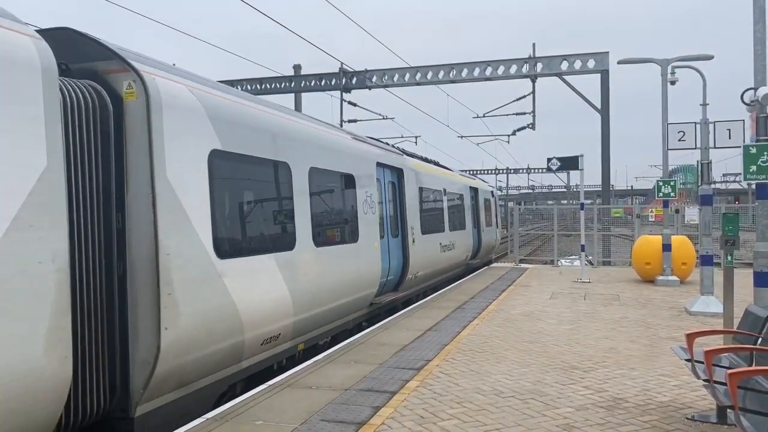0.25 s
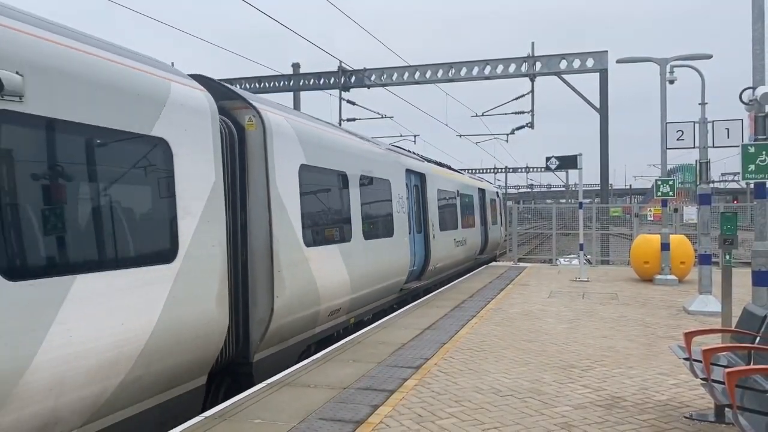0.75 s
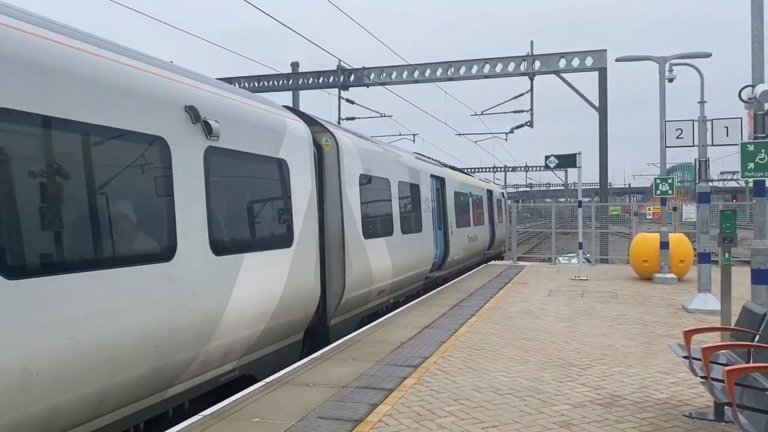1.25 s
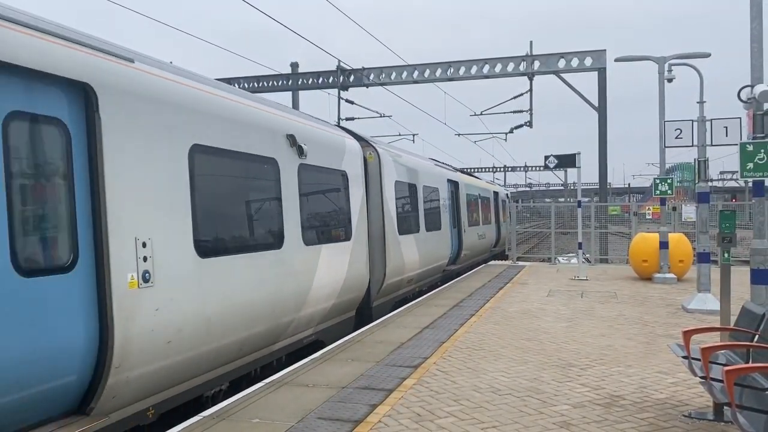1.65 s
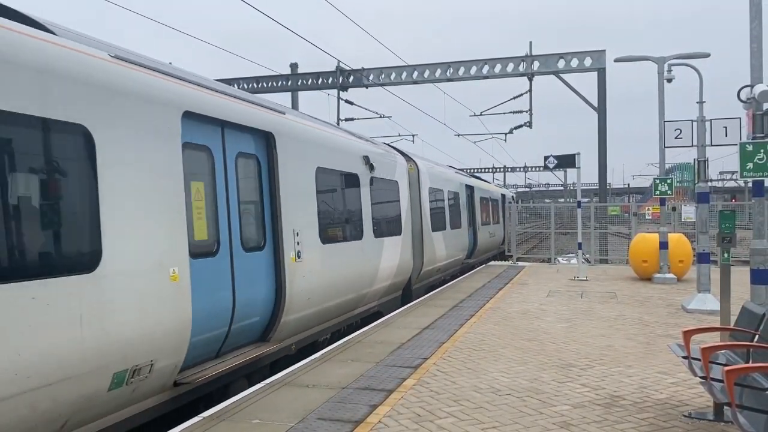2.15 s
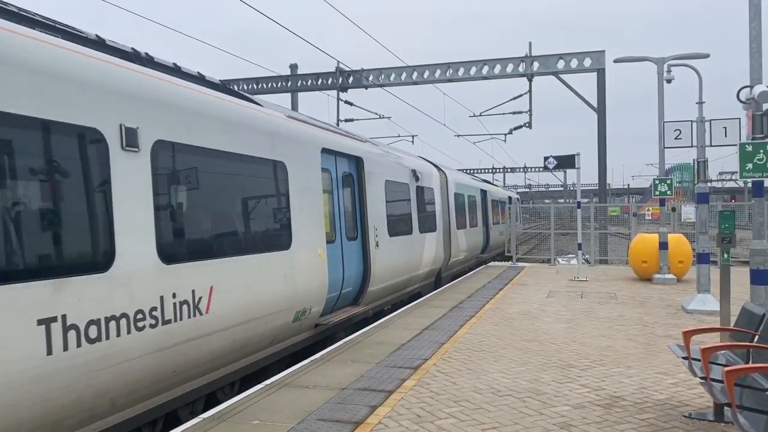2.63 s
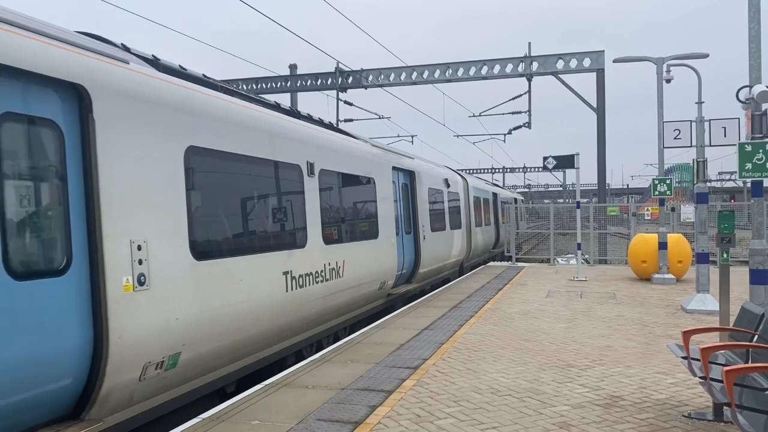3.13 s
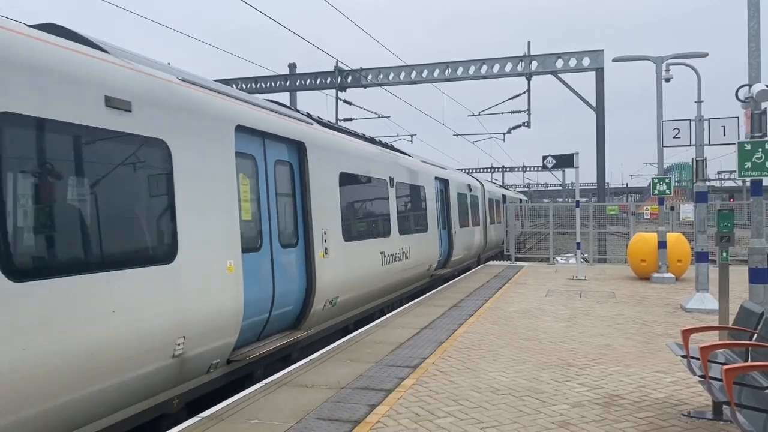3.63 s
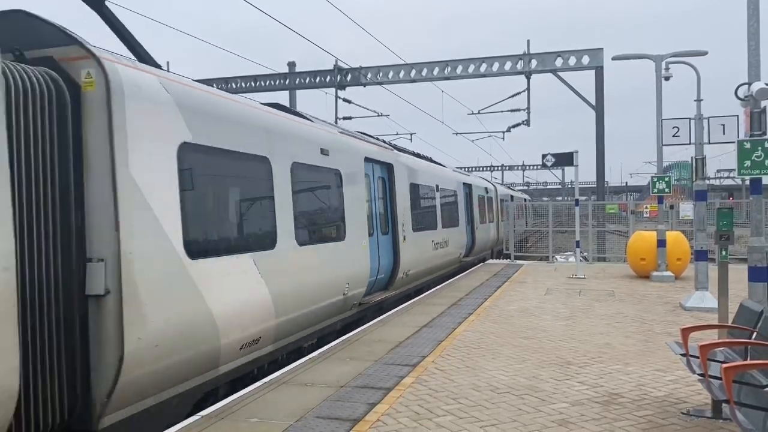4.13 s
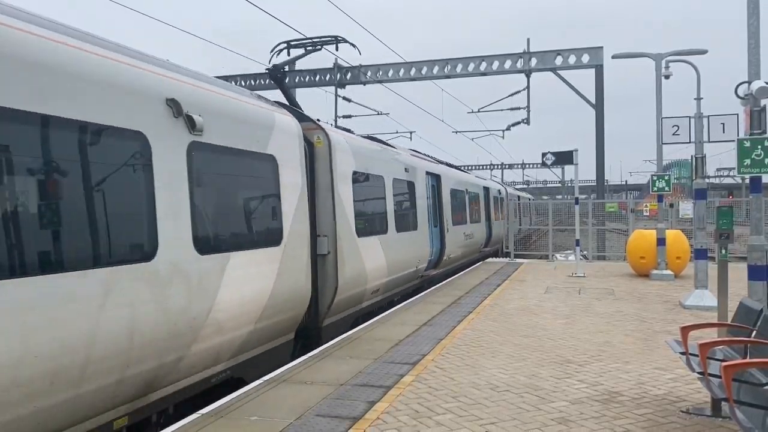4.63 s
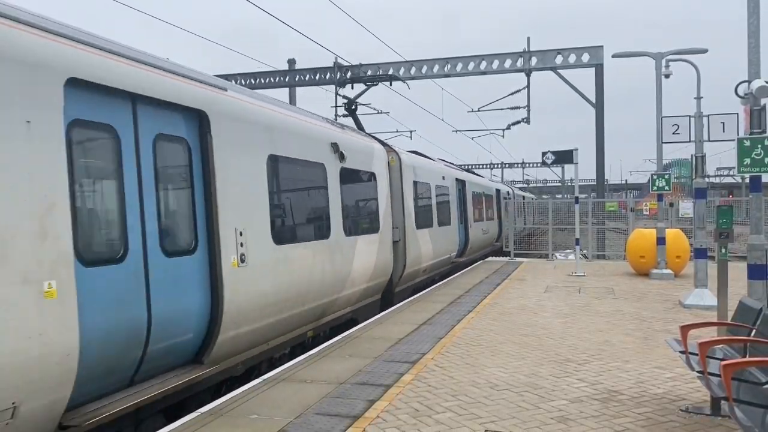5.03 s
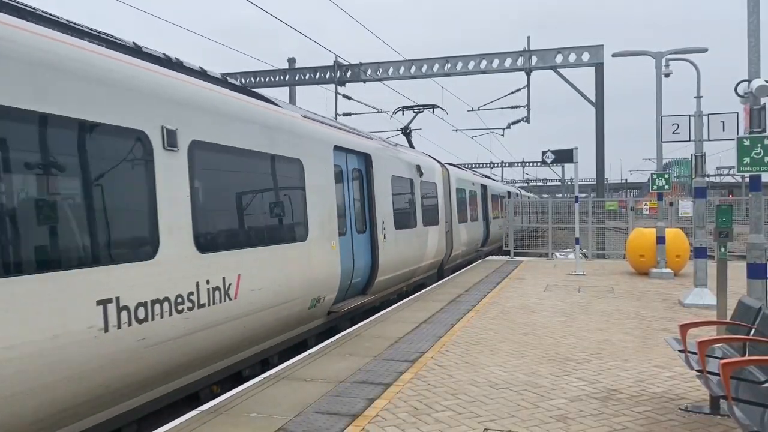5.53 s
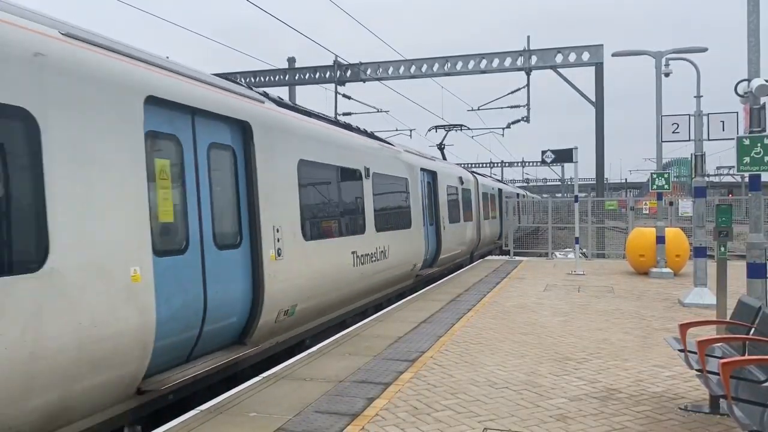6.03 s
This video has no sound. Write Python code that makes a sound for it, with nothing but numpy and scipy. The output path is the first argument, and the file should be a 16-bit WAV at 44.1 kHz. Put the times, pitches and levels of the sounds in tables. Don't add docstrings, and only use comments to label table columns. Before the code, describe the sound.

Close stereo phone pickup of an accelerating electric train outdoors. Fixed-rate electric motor singing mixes with low gear hum that slides upward. Underfloor converters buzz past in turn, thin cooling air rushes, and the wheels rumble with soft booming jolts rather than sharp clacks. Rail hiss brightens in the second half, with a short wheel squeak just before the end, while the train is still passing.

```python
import sys
import numpy as np
from scipy import signal
from scipy.fft import rfft, irfft, next_fast_len
from scipy.io import wavfile
from scipy.ndimage import uniform_filter1d

SR = 44100
rng = np.random.default_rng(int(sys.argv[2]) if len(sys.argv) > 2 else 0)


def attenuation_scalar(level_db):
    decades = np.asarray(level_db, float) / 20
    return 10 ** decades


def put_to_file(sound):
    columns = np.atleast_2d(sound).T
    safe = np.clip(columns, -1, 1)
    whole_steps = np.round(safe * 32767)
    wavfile.write(sys.argv[1], SR, whole_steps.astype(np.int16))


N = 276947

METRES_PER_TURN = .047
# [passing t/s, strength/dB]
MOTOR_CARS = [
    (-.2, 1.5),
    (4.351, 0.5),
    (6.3, -4.5),
]


def evened(x):
    return x / np.sqrt(np.mean(x ** 2) + 1e-20)


def read(points, hz, count=1):
    table = np.transpose(points)
    return np.interp(np.log(hz + 1), np.log(table[0] + 1), table[count])


def curves(rows, t):
    s, *columns = np.transpose(rows)
    return np.array([np.interp(t, s, c) for c in columns])


def frame_grid(size):
    t = np.arange(N * 4 // size + 6) * size / 4 / SR
    return t, np.fft.rfftfreq(size, 1 / SR)[:, None]


def noise(power):
    size = 2 * len(power) - 2
    real, imag = rng.standard_normal((power.shape[1], len(power), 2, 2), np.float32).T
    spectra = (real + 1j * imag) * np.sqrt(power * SR * 2 / size)
    return signal.istft(spectra, nperseg=size, noverlap=size * 3 // 4)[1][:, :N]


def hump(hz, centre_hz, width_hz):
    return np.exp(-.5 * ((hz - centre_hz) / width_hz) ** 2) / (np.sqrt(2 * np.pi) * width_hz)


def wavering(turns, spread):
    now = np.arange(N)
    drift, fade = uniform_filter1d(rng.standard_normal((2, 2, N // 512 + 2)), size=3)
    knots = np.arange(drift.shape[1]) * 512
    fade = evened(attenuation_scalar(2.5 * evened(fade)))
    wander = np.array([np.interp(now, knots, np.cumsum(d)) for d in drift])
    strength = np.array([np.interp(now, knots, d) for d in fade])
    return np.sqrt(2) * strength * np.sin(2 * np.pi * (turns + spread * wander))


def swells(lists, t):
    def summed(rows):
        return sum((db * np.exp(-((t - s) / half_s) ** 2) for s, half_s, db in rows), 0 * t)
    return np.array([summed(rows) for rows in lists])


def gear_rate(t):
    return 44.14 + 18.2 * t - .12 * t ** 2


def passing(t, pass_s, nearest_m=2.66):
    speed = METRES_PER_TURN * gear_rate(t)
    along = np.cumsum(speed) * (t[1] - t[0])
    along = along - np.interp(pass_s, t, along) - min(pass_s, 0) * speed[0]
    metres = np.hypot(along, nearest_m)
    return 1 - speed * along / metres / 343, metres


def by_motor_cars(parts, t):
    near = sum(attenuation_scalar(2 * db) * (2.535 / passing(t, s)[1]) ** 2 for s, db in MOTOR_CARS)
    near_db = 10 * np.log10(near)
    return np.array([db + follow * np.interp(t - lag, t, near_db) + db_per_s * t
                     for db, follow, db_per_s, lag in parts])


def blowers():
    # [level beside a motor car/dB, follow/(dB per dB of nearness), growth/(dB/s), lag/s]
    rushes = [(-67.5, 0.6, 2.28, 0.09), (-67.5, 1.0, 1.2, .15)]
    t, hz = frame_grid(size=1024)
    low_db, high_db = by_motor_cars(rushes, t)
    low = attenuation_scalar(2 * (low_db + 2.5)) * hump(hz, 9040, 900)
    high = attenuation_scalar(2 * (high_db - 2.5)) * hump(hz, 13800, 1000)
    return noise(low + high)


def wheels():
    # [t/s, level/dB]
    load = [(0.0, -58), (0.3, -60), (0.6, -60), (1.75, -58), (2.1, -58), (2.89, -57), (3.2, -56.5),
            (3.78, -54.5), (4.2, -51.5), (4.67, -51.5), (5.1, -52.5), (5.35, -53), (5.81, -50.5),
            (6.05, -48.5), (6.28, -49.5)]
    # [level at middling load/dB, follow/(dB per dB of load)]
    load_parts = [(-36.5, .75), (-33, 0.95), (-48.5, 1.71)]
    # [t/s, half length/s, rise/dB]
    jolts = [
        [(0.5, 0.049, 6), (3.06, .07, -0.5), (3.4, 0.14, 5), (5.13, 0.05, 3), (5.3, .05, 5)],
        [(0.25, 0.14, 5), (3.15, 0.13, 4.5), (3.41, 0.17, 1.5), (3.75, 0.056, -8.5), (4.29, 0.094, -9),
         (4.6, 0.094, 2.5), (5.2, 0.13, 6), (5.4, 0.22, 7), (5.95, 0.033, -9), (6.2, 0.19, 1)],
        [(4.29, 0.065, 6.5), (5.15, 0.044, -3), (5.81, .05, 2)],
    ]
    # [f/Hz, level/dB per Hz]
    rumble, boom = [(15, -42), (26, -12), (60, 1), (118, -4.5), (145, -1), (177, -3.5), (200, 0.5),
                    (260, -36), (440, -120)], [(59, -29), (100, -26), (145, -19), (182, -15.5), (247, 4.5),
                                    (329, -12.5), (443, -16.5), (500, -13.5), (650, -63), (1100, -120)]
    hiss_far, hiss_near = [(350, -73), (700, -74), (1100, -79.5), (1600, -82), (1800, -83), (2350, -87.5),
                           (3750, -92.5), (4400, -92.5), (5000, -91.5), (7100, -99), (8700, -89),
                           (11300, -100), (12800, -106), (15000, -108)], [(350, -63.5), (700, -67), (1100, -72), (1600, -72.5),
                                             (1800, -71.5), (2350, -72.5), (3750, -75.5), (4400, -76),
                                             (5000, -80.5), (7100, -86), (8700, -99), (11300, -95),
                                             (12800, -99), (15000, -103)]
    # [f/Hz, width/Hz, level/dB]
    rail = [(1994, 42, -5.5), (2144, 27, -3.5), (2535, 62, -3.5)]
    # [t/s, half length/s, level/dB, f/Hz]
    squeaks = [
        (4.3, .04, -45, 2140),
        (5.815, 0.033, -34.5, 2220),
    ]

    t, hz = frame_grid(size=2048)
    load_db = curves(load, t)[0]
    levels = [db + follow * (load_db + 55) for db, follow in load_parts]
    rumble_db, boom_db, rail_db = levels + swells(jolts, t)
    near = np.clip((load_db + 59) / 9, 0, 1.3)
    hiss_db = (1 - near) * read(hiss_far, hz) + near * read(hiss_near, hz) + 0.15
    hiss_db = hiss_db - 60 * (hz < 250) - 8.4 * np.clip(hz / 3000 - 2.5, 0, 1.7)

    power = attenuation_scalar(2 * (rumble_db + read(rumble, hz) - 20.5))
    power += attenuation_scalar(2 * (boom_db + read(boom, hz) - 24.5))
    power += attenuation_scalar(2 * hiss_db)
    for f, width, db in rail:
        power += attenuation_scalar(2 * (rail_db + db)) * hump(hz, f, width)
    for s, half_s, db, f in squeaks:
        power += attenuation_scalar(2 * db) * hump(hz, f, 28) * np.exp(-2 * ((t - s) / half_s) ** 2)

    patches = rng.standard_normal((len(hz), len(t)))
    patches = uniform_filter1d(uniform_filter1d(patches, size=14, axis=0), size=8, axis=1)
    return noise(power * attenuation_scalar(2 * 1.7 * evened(patches)))


def converter():
    # [passing t/s, lower cluster/dB, upper cluster/dB], levels when nearest
    boxes = [
        (2.27, -42.5, -48),
        (3.7, -50.5, -54.5),
        (4.7, -43, -54),
        (6.5, -44.5, -53),
    ]
    step_hz = 95.6
    t, hz = frame_grid(size=8192)
    shift = passing(t, 2.22, 5.2)[0]
    far = [passing(t, s, 3.71)[1] / 4.01 for s, _, _ in boxes]
    low_db = 10 * np.log10(sum(attenuation_scalar(2 * db) / m ** 3 for (_, db, _), m in zip(boxes, far)))
    high_db = 10 * np.log10(sum(attenuation_scalar(2 * db) / m ** 4.8 for (_, _, db), m in zip(boxes, far)))

    power = attenuation_scalar(2 * (low_db - 3.5)) * hump(hz, 3080 * shift, 152)
    power += attenuation_scalar(2 * (high_db - 3.0)) * hump(hz, 5985 * shift, 240)
    power += attenuation_scalar(2 * (high_db - 13.0)) * hump(hz, 8850 * shift, 260)
    for k in range(-2, 3):
        power += attenuation_scalar(2 * (low_db - 11.0)) * hump(hz, (3072 + k * step_hz) * shift, 7.4)
        power += attenuation_scalar(2 * (high_db - 11.5)) * hump(hz, (6035 + k * step_hz) * shift, 5.2)
    return noise(power)


def gears():
    multiples = [1, 2, 3, 8, .8, 1.6, 2.5, 4, 5, 6, 7, 9]
    # [level at the start/dB, growth/(dB/s)]
    tones = [(-49, 1.64), (-48, 1.95), (-51, 1.05), (-59, 1), (-54, 1.75), (-52.5, 1.5), (-48, -1.04),
             (-55, 1.3), (-50.5, -0.24), (-56, 0.73), (-57, 1.2), (-55.5, 1.23)]
    # [t/s, half length/s, rise/dB]
    tone_swells = [
        [(1.42, .1, 4.5), (2.05, 0.082, 9.5), (2.6, 0.28, 5), (3.3, 0.22, 6), (5.2, 0.22, 8), (5.54, .06, 12.5),
         (6.11, .1, 16.5)],
        [(0.07, 0.046, 10), (3.9, 0.082, 9.5), (4.55, 0.2, 6), (5.46, 0.21, 9.5)],
        [(1.89, 0.11, 17.5), (4.2, 0.27, 7), (5.55, 0.086, 10), (5.95, 0.2, 10.5)],
        [(3.55, 0.82, 12.5), (4.4, 0.39, 9), (5.1, 0.45, 10), (6.15, 0.072, 8)],
        [(2.99, .15, 15)],
        [(2.99, 0.078, 10.5), (3.32, .07, 8), (4.05, .15, 7), (5.7, 0.13, 12.5), (6.15, .12, 13.5)],
        [(2.17, 0.18, 15.5), (3.44, .1, 19.5)],
        [(3.69, 0.15, 10.5), (5.85, 0.07, 11), (6.05, 0.07, 11)],
        [(0.6, 0.27, 8), (6.15, 0.17, 12)],
        [],
        [(4.2, 0.27, 8)],
        [(4.6, .3, 4)],
    ]
    t, coarse = np.arange(N) / SR, frame_grid(size=1024)[0]
    turns = np.cumsum(gear_rate(t)) / SR
    levels = [db + db_per_s * coarse for db, db_per_s in tones] + swells(tone_swells, coarse)
    out = 0
    for k, db in zip(multiples, levels):
        out = out + np.interp(t, coarse, attenuation_scalar(db)) * wavering(k * turns, .04 + .011 * k ** 1.5)
    return out


def whine_db(t):
    # [level beside a motor car/dB, follow/(dB per dB of nearness), growth/(dB/s), lag of its beam/s]
    parts = [(-47, 0.42, 1.36, 0.12), (-37.5, 1.02, 0.22, 0.054), (-51.5, 1.86, 1.0, 0.22),
             (-53, 1.6, 1.47, -0.23)]
    # [t/s, half length/s, change/dB]
    beats = [
        [(2.9, .5, 3.5), (3.76, 0.047, 5.5), (3.99, 0.066, -3), (4.3, 0.082, 4), (4.65, .05, 6.5),
         (4.8, .06, -1), (4.99, 0.06, 10), (5.14, 0.086, -1), (5.42, .18, 7)],
        [(0.7, 0.028, 8), (0.78, 0.058, -11), (0.87, 0.022, 2.5), (1.15, 0.25, -2.5), (2.57, 0.16, 4),
         (3.95, 0.096, 2), (5.35, 0.32, -1)],
        [(4.4, 0.18, 0.5), (5.7, 0.49, 3)],
        [(5.9, 0.37, 2)],
    ]
    return by_motor_cars(parts, t) + swells(beats, t)


def motors():
    # [multiple of the switching rate, width at rest/Hz, widening/(Hz per m/s), level/dB]
    overtones = [(2, 20, 1.2, -6), (3, 38, 7.3, -14.5), (4, 4.9, 8.9, 1.35), (5, 21, 3.6, -14.5),
                 (6, 20, 5.5, 1.1), (7, 22, 6.1, -8), (8, 18, 9.9, 2.2), (9, 60, 8, -18),
                 (10, 39, 6.4, -11), (12, 41, 10, -9), (14, 45, 13, -10.5), (16, 45, 16, -16.5),
                 (18, 42, 11, -14), (20, 60, 18, -29), (22, 45, 18, -23)]
    follows = [0, 0, 1, 1, 2, 2, 3, 3, 2, 2, 2, 2, 2, 2, 2]
    switch_hz = 675.3
    t, hz = frame_grid(size=4096)
    speed, level_db = METRES_PER_TURN * gear_rate(t), whine_db(t)
    cars = [passing(t, s) for s, _ in MOTOR_CARS]
    near = np.array([attenuation_scalar(2 * db) / m ** 0.67 for (_, db), (_, m) in zip(MOTOR_CARS, cars)])
    share = near / near.sum(0)

    power = np.zeros((len(hz), len(t)))
    for (k, rest_hz, widen_hz, db), part in zip(overtones, follows):
        k, width = round(k), rest_hz + widen_hz * speed
        rows = abs(hz[:, 0] - k * switch_hz) < 900
        heard = share ** (1 + k / 7)
        heard = heard / heard.sum(0)
        lines = sum(w * hump(hz[rows], k * switch_hz * shift, width) for w, (shift, _) in zip(heard, cars))
        power[rows] += attenuation_scalar(2 * (level_db[part] + db)) * lines
    out = noise(power)

    now = np.arange(N) / SR
    tone_db = curves(np.transpose([t, *level_db[:2]]), now)
    double, fourfold = attenuation_scalar(tone_db + [[0.5], [-4.5]])
    for w, (shift, _) in zip(share, cars):
        turns = np.cumsum(np.interp(now, t, 2 * switch_hz * shift)) / SR
        w = np.sqrt(np.interp(now, t, w))
        out += double * w * wavering(turns, 0.042)
        out += fourfold * w * wavering(2 * turns, 0.09)
    return out


def scene():
    return blowers() + wheels() + converter() + gears() + motors()


def roll_off(x):
    return signal.sosfilt(signal.butter(12, 15810, fs=SR, output="sos"), x)


def record(dry):
    # [f/Hz, likeness 0-1, lead of the right/rad, left over right/dB]
    ports = [(150, .98, .24, .2), (350, .95, .25, .5), (650, .72, -.8, -2.1), (1050, .85, -1.6, -.8),
             (1500, .5, -2.6, -4.8), (1900, .62, -5.4, -1.8), (2400, .68, -6.4, -1.3), (2800, .5, -7.6, .9),
             (3600, .6, -6.8, 5.7), (4500, .45, -7.1, 1.6), (5350, .1, -6.3, 1.4), (6400, .64, -6.5, -1),
             (8500, .89, -3.1, 0), (12300, .98, 3.2, 0), (15300, .9, 9, 0)]
    # [t/s, left over right/dB]
    pan = [
        (0.0, 2),
        (0.61, 0.5),
        (1.08, 0.5),
        (4.29, 0),
        (4.63, 1),
        (6.28, 0.5),
    ]
    size = next_fast_len(N)
    hz = np.fft.rfftfreq(size, 1 / SR)
    direct, scattered = rfft(dry, size)
    table = np.transpose(ports)
    same = np.clip(read(ports, hz), 0, 1)
    lead = np.interp(hz, table[0], table[2])
    tilt = attenuation_scalar(read(ports, hz, count=3) / 2)
    right = (same * direct + np.sqrt(1 - same ** 2) * scattered) * np.exp(1j * lead)
    low_cut = 1 / np.sqrt(1 + (40 / (hz + 1)) ** 6)
    pair = irfft(np.array([direct * tilt, right / tilt]) * low_cut, size)[:, :N]
    pan_db = curves(pan, np.arange(N) / SR)[0] - .4
    return roll_off(pair * attenuation_scalar([pan_db / 2, -pan_db / 2]))


dry = scene()
out = record(dry)
put_to_file(out)
```